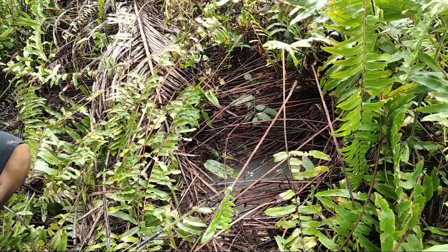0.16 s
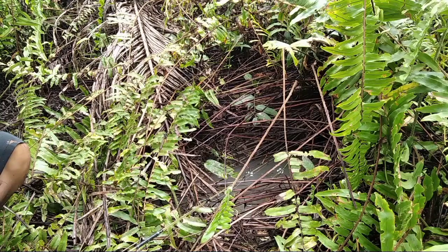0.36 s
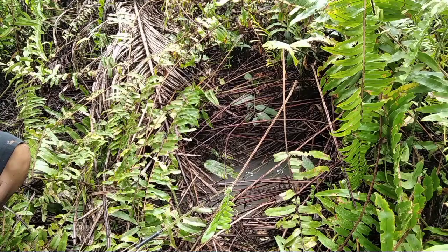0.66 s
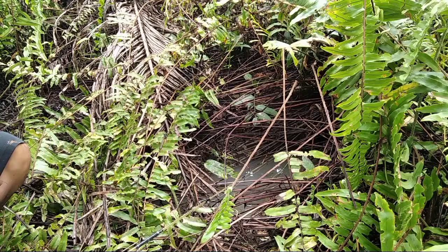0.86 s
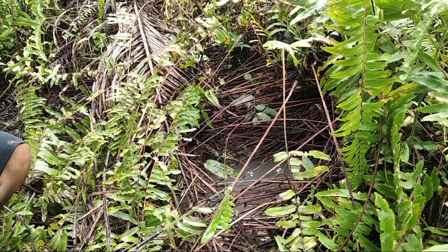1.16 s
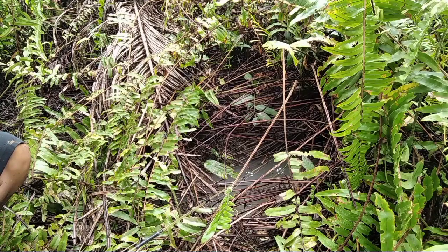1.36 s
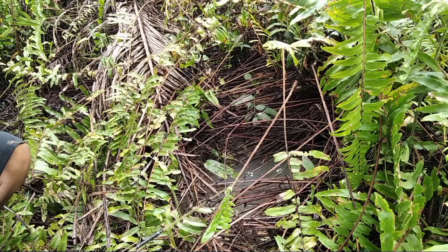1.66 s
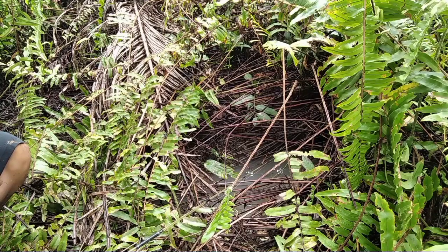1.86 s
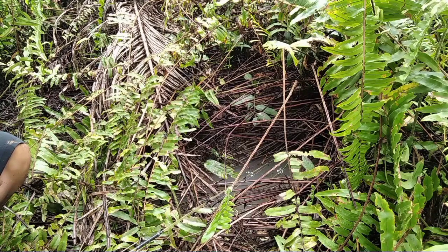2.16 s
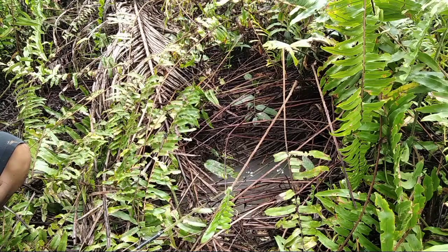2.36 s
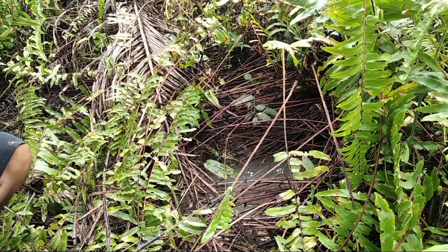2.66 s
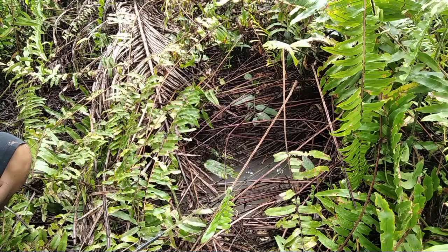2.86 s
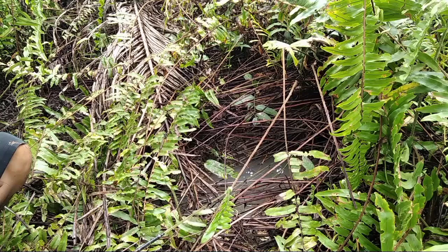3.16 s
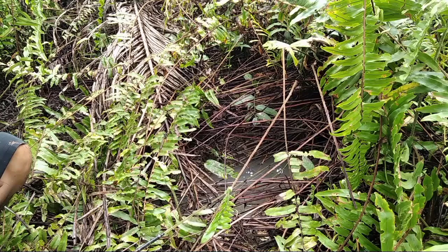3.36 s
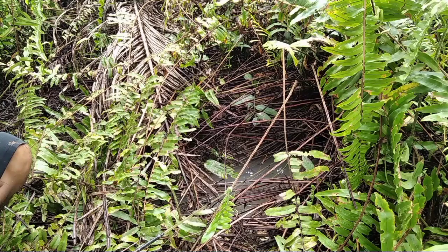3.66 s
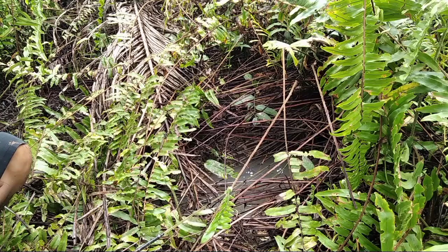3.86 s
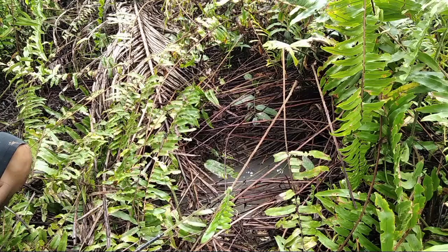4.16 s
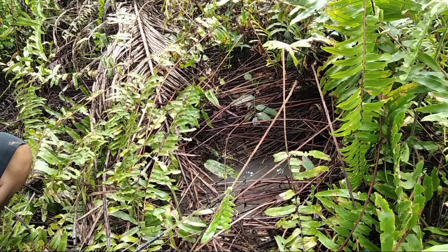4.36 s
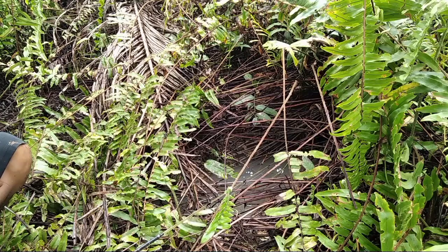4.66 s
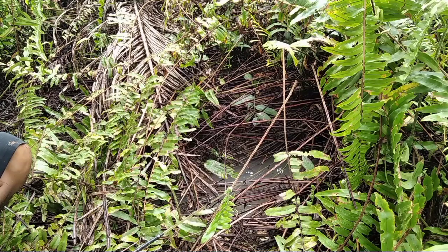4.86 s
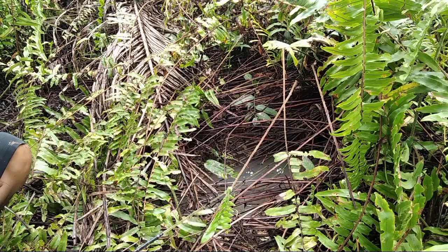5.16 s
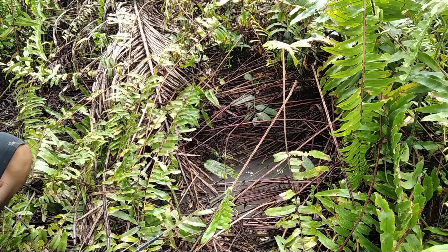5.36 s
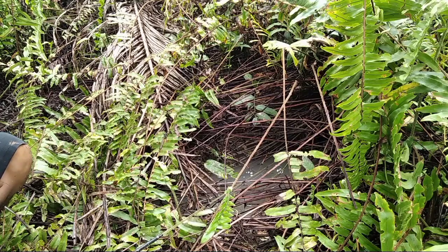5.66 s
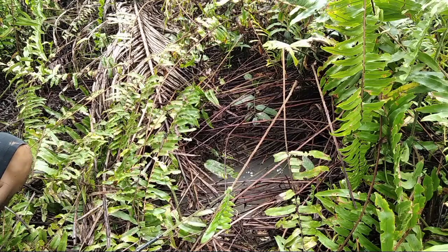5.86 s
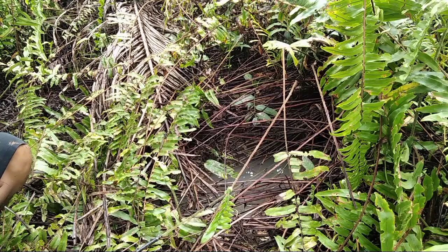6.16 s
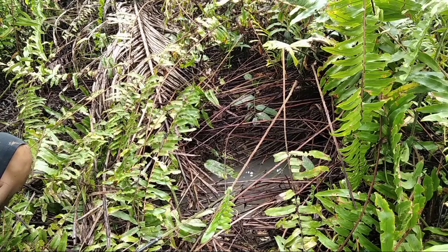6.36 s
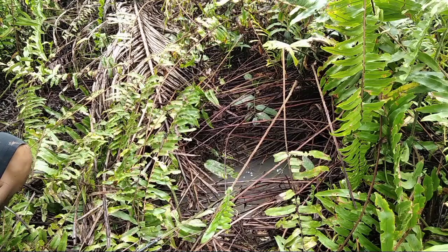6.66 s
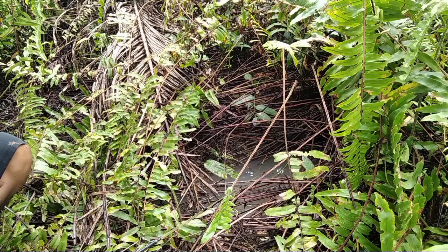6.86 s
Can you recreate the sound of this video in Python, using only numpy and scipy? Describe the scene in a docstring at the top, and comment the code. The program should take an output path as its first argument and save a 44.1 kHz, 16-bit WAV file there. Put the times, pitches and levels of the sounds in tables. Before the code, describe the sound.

Outdoors in ferny undergrowth, a continuous high insect shrill dominates, with nearer katydids pulsing rapidly and thin cricket tones inside it. Far behind, a cicada whines near the start and again late, a bird repeats a short raspy phrase, and another whistles four descending notes toward the end. Dry twigs tick occasionally; a very faint engine wavers. The stereo microphone sits amid the insects, with soft air and light breeze rumble.

```python
"""A dense insect chorus shrills in the ferns of a plantation, many rough pulse trains blurred by leaf echoes.
Three nearer katydids pulse inside it as filtered bursts of noise, and thin cricket tones run through it.
Far off, a cicada whines on and off, one bird repeats a short raspy phrase of fluttering tones,
and another whistles four notes, each starting lower than the last. A few dry twigs tick as ringing
cracks, and a very distant engine wavers as a few harmonics over the soft noise rumble of the air."""
import sys
import numpy as np
from scipy import signal
from scipy.fft import rfft, irfft
from scipy.io import wavfile

SR = 44100
rng = np.random.default_rng(int(sys.argv[2]) if len(sys.argv) > 2 else 0)


def put_to_file(sound):
    """Save the sound as 16-bit audio at rate SR, in the file named by the first command-line argument."""
    columns = np.atleast_2d(sound).T  # one column per channel
    safe = np.clip(columns, -1, 1)
    whole_steps = np.round(safe * 32767)
    wavfile.write(sys.argv[1], SR, whole_steps.astype(np.int16))


N = 310023


def from_db(db):
    """Decibels to gain."""
    return 10 ** (np.asarray(db) / 20)


def rms_one(x):
    """Scale to rms 1."""
    return x / np.sqrt(np.mean(x ** 2) + 1e-20)


def seconds():
    """The time of every sample."""
    return np.arange(N) / SR


def in_time(rows):
    """Join the rows of a curve by straight lines, one array per column."""
    s, *columns = np.transpose(rows)
    return [np.interp(seconds(), s, column) for column in columns]


def turning(hz):
    """The phase in radians of an oscillation whose rate follows a curve in Hz."""
    return 2 * np.pi * np.cumsum(hz) / SR


def bins_hz():
    """The frequencies of a whole-length spectrum, with the lowest bin kept off zero."""
    return np.maximum(np.arange(N // 2 + 1), 1) * SR / N


def over_hz(points):
    """Join (Hz, value) points on a log-frequency axis."""
    hz, value = np.transpose(points)
    return np.interp(np.log(bins_hz()), np.log(hz), value)


def colour(x, spectrum):
    """Weight x by a spectrum that falls away steeply outside its ends; rms 1."""
    hz = bins_hz()
    lowest_hz, highest_hz = spectrum[0][0], spectrum[-1][0]
    skirts = np.minimum(1, np.minimum(hz / lowest_hz, highest_hz / hz)) ** 24
    return rms_one(irfft(rfft(x) * from_db(over_hz(spectrum)) * skirts, N))


def resonate(x, hz, width_hz):
    """A two-pole resonance with gain 1 on top."""
    r = np.exp(-np.pi * width_hz / SR)
    feed = np.array([1, 0, -1]) * (1 - r * r) / 2
    feedback = [1, -2 * r * np.cos(2 * np.pi * hz / SR), r * r]
    return signal.lfilter(feed, feedback, x + 1e-18)


def drift(rate):
    """Smooth chance of spread 1 that changes about `rate` times a second."""
    low_pass = signal.butter(2, rate, fs=SR, output="sos")
    # the first second lets the filter settle
    return rms_one(signal.sosfilt(low_pass, rng.standard_normal(N + SR))[SR:])


def pan(lean_db):
    """Left and right gains for a level difference, left minus right."""
    return from_db(np.array([[.5], [-.5]]) * lean_db)


def foliage(x, t60, wet_db, lag_s=0):
    """Direct sound, later on the left for a positive lag, plus a dying cloud of leaf echoes; keeps the power."""
    t = np.arange(int(t60 * SR) + 128) / SR
    paths = rng.standard_normal((2, len(t))) * from_db(-60 * t / t60)
    paths *= from_db(wet_db) / np.linalg.norm(paths, axis=1, keepdims=True)
    paths[0, round(max(lag_s, 0) * SR)] += 1
    paths[1, round(max(-lag_s, 0) * SR)] += 1
    paths /= np.linalg.norm(paths, axis=1, keepdims=True)
    return signal.oaconvolve(x[None], paths, axes=1)[:, :N]


def stridulate(syllable_rate, pulse_rate, share, pulse_decay_s, unsteady):
    """Each syllable is a swelling run of wing strokes, each a short, rounded burst of file-tooth scraping."""
    t = seconds()
    wander = unsteady * np.sin(2 * np.pi * (t * rng.uniform(.1, .3) + rng.random()))  # in syllables
    phase = (syllable_rate * t + wander + rng.random()) % 1
    since_stroke = phase / syllable_rate % (1 / pulse_rate)
    # the swell steps once per stroke, so every stroke has one strength
    stroke_phase = phase - since_stroke * syllable_rate + .5 * syllable_rate / pulse_rate
    swell = np.sin(np.pi * np.minimum(stroke_phase / share, 1))
    stroke = since_stroke * np.exp(-since_stroke / pulse_decay_s)
    return rms_one(swell * stroke * rng.standard_normal(N))


# Spectra of the ferns' main shrill, a lower species and a very high one.
# Each row: frequency in Hz, relative density in dB per Hz.
SHRILL_SPECTRUM = [(5900, -65), (6250, -26.5), (6760, -9), (7100, 2), (7600, 4.5), (8050, 2.5), (8500, -4),
                   (9000, -12.5), (9650, -18), (10200, -25.5), (11100, -24), (11900, -35.5), (13200, -45)]
LOW_SHRILL_SPECTRUM = [(4800, -20), (5100, -8), (5350, 3.5), (5650, 14.5), (5900, 12), (6200, -14),
                       (6500, -54)]
HIGH_SHRILL_SPECTRUM = [(13000, -32), (13150, -8), (13300, -11), (13650, -11), (13900, -2), (14200, -4),
                        (14400, -30)]
# Where the chorus sits across the stereo pair. Each row: frequency in Hz, left minus right in dB.
CHORUS_LEAN = [(6000, -0.5), (6900, -0.5), (7500, -2.5), (8000, -3.5), (8400, 7), (8750, -12), (9300, 11.5),
               (10500, -0.5), (12500, 2), (13800, 4)]


def chorus(count=16):
    """Many insects, each at its own pace and place, blur into a shrill in three registers."""
    crowd = 0
    for pace, strokes, side in rng.uniform(-1, 1, (count, 3)):
        song = stridulate(28 + 9 * pace, 170 + 70 * strokes, share=.78, pulse_decay_s=.0011, unsteady=1.2)
        crowd = crowd + foliage(song, t60=.16, wet_db=6, lag_s=.00045 * side)
    voices = from_db(-27) * colour(crowd, SHRILL_SPECTRUM)
    voices += from_db(-56) * colour(crowd, LOW_SHRILL_SPECTRUM)
    voices += from_db(-51.5) * colour(crowd, HIGH_SHRILL_SPECTRUM)
    return irfft(rfft(voices) * pan(over_hz(CHORUS_LEAN)), N)


# Three singers nearer the microphones. Each row: syllables per second, wing strokes per second,
# sounding share of a syllable, pitch in Hz, half-width in Hz, level in dB, left minus right in dB,
# lag of the left side in seconds, upper wing resonance in dB against the main one.
NEAR_KATYDIDS = [(26.44, 101, .74, 8180, 380, -37, -3, .00041, -17),
                 (24.2, 92, .7, 8720, 200, -46.5, 4, -.00036, -30),
                 (25.3, 177, .8, 13950, 250, -57, 4, 0, -60)]
UPPER_WING_RATIO = 1.2  # upper wing resonance over the main pitch


def wing_resonance(song, hz, half_width_hz):
    """The wing lets through one band of the scraping; rms 1."""
    band = [hz - half_width_hz, hz + half_width_hz]
    return rms_one(signal.sosfilt(signal.butter(3, band, "band", fs=SR, output="sos"), song))


def katydids():
    """Near singers: regular syllables of a few strokes ring two wing resonances and stay distinct."""
    out = 0
    for syllable_rate, pulse_rate, share, hz, half_width_hz, level_db, lean_db, lag_s, upper_db in NEAR_KATYDIDS:
        song = stridulate(syllable_rate, pulse_rate, share, pulse_decay_s=.0018, unsteady=.04)
        main = wing_resonance(song, hz, half_width_hz)
        upper = wing_resonance(song, hz * UPPER_WING_RATIO, half_width_hz)
        heard = foliage(main + from_db(upper_db) * upper, t60=.05, wet_db=-6, lag_s=lag_s)
        out = out + from_db(level_db) * pan(lean_db) * heard
    return out


def blurred_tone(hz, width_hz):
    """A tone on a pitch curve whose strength and phase flutter, spreading it over a width."""
    phase = turning(hz * np.ones(N))
    return rms_one(drift(width_hz / 2) * np.cos(phase) + drift(width_hz / 2) * np.sin(phase))


# Crickets among the ferns, each on one steady pitch.
# Each row: pitch in Hz, width in Hz, level in dB, left minus right in dB.
CRICKET_TONES = [(7548, 30, -43.5, -7), (7677, 60, -46.5, -12), (7950, 25, -47, 4), (8280, 50, -49, 9),
                 (9690, 55, -57, 5), (10170, 45, -65, 8), (10304, 55, -65, 8), (11170, 70, -69, 6)]


def crickets():
    """Thin tones of steady pitch inside the shrill, each fluttering within a narrow band."""
    out = 0
    for hz, width_hz, level_db, lean_db in CRICKET_TONES:
        heard = foliage(blurred_tone(hz, width_hz), t60=.02, wet_db=5)
        out = out + from_db(level_db) * pan(lean_db) * heard
    return out


# How alike the air is at the two microphones.
# Each row: frequency in Hz, likeness from -1 (opposite) to 1 (the same).
LEFT_RIGHT_LIKENESS = [(40, 0.51), (150, 0.3), (400, 0.16), (900, -0.06), (1400, -0.08), (2200, 0.056),
                       (5000, -0.22)]


def moving_air(spectrum):
    """Stereo noise, clearly alike on both sides only in the bass."""
    mid, side = rfft(rng.standard_normal((2, N)))
    alike = np.clip(over_hz(LEFT_RIGHT_LIKENESS), -1, 1)
    stereo = np.sqrt(1 + alike) * mid + np.sqrt(1 - alike) * side * [[1], [-1]]
    return colour(irfft(stereo, N), spectrum)


# Still air of the place, then breeze rumble on the microphone.
# Each row: frequency in Hz, relative density in dB per Hz.
AIR_SPECTRUM = [(40, -47), (75, -14), (100, -7), (125, -12), (320, -19), (520, -20), (1000, -23),
                (2200, -26), (3500, -29.5), (4300, -28.5), (4700, -29.5), (14000, -54)]
RUMBLE_SPECTRUM = [(10, 8), (28, -7), (45, -2), (60, -9), (80, -25.5), (140, -55)]
# Gusts at the microphone. Each row: time of the peak in seconds, rise in dB.
BREEZE_GUSTS = [(3.5, 1.5), (4.1, 2.5), (4.7, 6.5), (5.85, 5.5), (6.6, 2)]
BREEZE_DB, GUST_S = -54, 0.15  # rumble between gusts, time from a gust's peak to 1/e of its rise


def air():
    """A steady far hush, and a light breeze rumbling on the microphone in soft gusts."""
    t = seconds()
    gusts_db = sum(rise_db * np.exp(-((t - s) / GUST_S) ** 2) for s, rise_db in BREEZE_GUSTS)
    hush = from_db(-58.5) * moving_air(AIR_SPECTRUM)
    return hush + from_db(BREEZE_DB + gusts_db) * moving_air(RUMBLE_SPECTRUM)


# Bouts of the far cicada. Each row: time of full effort in seconds, level in dB.
CICADA_PEAKS = [(.68, -65.5), (6.131, -64.5)]
CICADA_BUILD_S, CICADA_FADE_S = 1.7, 0.41
CICADA_REST_HZ, CICADA_RISE_HZ = 4897, 294  # pitch at no effort, and what full effort adds


def cicada(width_hz=90):
    """A far, rough whine; effort builds and ebbs in each bout and lifts pitch and strength together."""
    t, whine = seconds(), 0
    for peak_s, level_db in CICADA_PEAKS:
        building = np.clip(1 + (t - peak_s) / CICADA_BUILD_S, 0, 1) ** .35
        effort = building * np.exp(-np.maximum(t - peak_s, 0) / CICADA_FADE_S)
        tone = blurred_tone(CICADA_REST_HZ + CICADA_RISE_HZ * np.sqrt(effort), width_hz)
        whine = whine + from_db(level_db) * effort ** .61 * tone
    return foliage(whine, t60=.27, wet_db=8)


# Phrases of the far raspy bird. Each row: start in seconds, level in dB, extra dB on its lowest rasp.
RASPY_PHRASES = [(0.025, -57.5, -4), (1.537, -58, -3), (3.865, -58.5, -2), (5.376, -60, 0.5)]
# The notes of a phrase. Each row: delay in seconds, length in seconds, pitch in Hz, glide in Hz,
# roughness as a width in Hz, level in dB against the phrase.
RASPY_NOTES = [(0, 0.11, 4230, 1, 200, -6.5), (0.13, .18, 1800, 200, 480, -5),
               (0.146, 0.18, 2408, 330, 450, -7), (0.269, 0.069, 2708, 610, 453, -3),
               (0.304, 0.126, 3336, 62, 109, -3)]
RATTLES_PER_S, RATTLE_DEPTH = 55, .45
LOW_RASP_BELOW_HZ = 2100  # a note pitched under this is the lowest rasp


def raspy_bird():
    """A rattling phrase of a high chip, two soft rasps and a quick sweep up into a clearer note."""
    song, t = 0, seconds()
    for delay, length, hz, glide_hz, width_hz, note_db in RASPY_NOTES:
        swell, glide = 0, 0
        for start, phrase_db, low_db in RASPY_PHRASES:
            progress = np.clip((t - start - delay) / length, 0, 1) % 1  # 0 outside the note
            level_db = phrase_db + note_db + low_db * (hz < LOW_RASP_BELOW_HZ)
            swell = swell + from_db(level_db) * np.sqrt(np.sin(np.pi * progress))
            glide = glide + progress
        song = song + swell * blurred_tone(hz + glide_hz * glide ** 2, width_hz)
    rattle = rms_one(1 + RATTLE_DEPTH * np.sin(turning(RATTLES_PER_S + 10 * drift(20.3))))
    return foliage(song * rattle, t60=.8, wet_db=1)


# Ticks of dry twigs. Each row: time in seconds, crack in dB, hollow knock in dB.
TWIG_TICKS = [(.323, -51, -70), (2.746, -53, -64), (3.0964, -53, -70), (3.139, -53, -70),
              (3.185, -54.5, -70), (3.27, -55, -60), (3.5887, -51.5, -58), (6.105, -51.5, -63),
              (6.13, -49, -53)]
# What a twig rings with. Each row: frequency in Hz, width in Hz, gain in dB.
TWIG_MODES = [(750, 600, 4), (1600, 1100, 8.5), (2650, 1200, 10.5)]
TWIG_DULL_HZ = 4300  # the undergrowth swallows what lies above
KNOCK_HZ, KNOCK_S = 894, 0.0092  # pitch and decay of the hollow knock


def twigs(crack_s=.01):
    """Small dry cracks of dying noise ring the twig's broad modes, with a hollow knock of varying strength."""
    t = seconds()
    cracking, knocks = 0, 0
    for s, crack_db, knock_db in TWIG_TICKS:
        begun, age = t >= s, np.abs(t - s)
        cracking = cracking + from_db(crack_db) * begun * np.exp(-age / crack_s)
        knock = np.exp(-age / KNOCK_S) * np.sin(2 * np.pi * KNOCK_HZ * (t - s))
        knocks = knocks + from_db(knock_db) * begun * knock
    cracks = cracking * rng.standard_normal(N)
    ringing = 0
    for k, (hz, width_hz, db) in enumerate(TWIG_MODES):
        ringing = ringing + (-1) ** k * from_db(db) * resonate(cracks, hz, width_hz)  # signs alternate
    ringing = signal.sosfilt(signal.butter(2, TWIG_DULL_HZ, fs=SR, output="sos"), ringing)
    return foliage(ringing + knocks, t60=.054, wet_db=12)


# Course of the engine far away. Each row: time in seconds, firing rate in Hz, level in dB.
ENGINE_COURSE = [(2.9, 255, -84), (3.25, 285, -81), (3.6, 258, -81), (4.3, 255, -88), (5.5, 252, -83),
                 (5.645, 260, -74), (5.7, 254, -76), (5.86, 267, -74), (5.955, 277, -67), (6.025, 258, -81),
                 (6.075, 247, -73), (6.115, 265, -67), (6.16, 252, -69.5), (6.21, 262, -80),
                 (6.275, 266, -72), (6.4, 259, -77), (6.57, 252, -75), (6.68, 242, -84), (6.82, 261, -76),
                 (6.94, 276, -72), (7.03, 284, -82)]
# Its partials. Each row: multiple of the firing rate, relative level in dB.
ENGINE_PARTIALS = [(1, 0), (2, 6), (3, -4), (4, -4)]
ENGINE_EMERGES_S = 0.66  # it swells out of the hush before the first row


def engine():
    """A small engine emerges far away, its speed wavering; the air between makes it fade in and out."""
    hz, level_db = in_time(ENGINE_COURSE)
    emerging = np.clip(1 + (seconds() - ENGINE_COURSE[0][0]) / ENGINE_EMERGES_S, 0, 1)
    phase = turning(hz * (1 + .024 * drift(30)))
    drone = sum(from_db(db) * np.sin(round(k) * phase) for k, db in ENGINE_PARTIALS)
    return foliage(emerging * from_db(level_db + drift(12)) * drone, t60=.2, wet_db=-8)


# Notes of the far whistling bird. Each row: start in seconds, length in seconds, starting pitch in Hz,
# rise in Hz, level in dB, dB that the leaves take from the direct path,
# phase between the two sides in radians, closing flick in Hz.
WHISTLE_NOTES = [(4.912, .24, 3100, 15, -59.3, 4, .7, 50), (5.48, .255, 2835, 85, -48.5, 1, 1.9, 130),
                 (6.137, .25, 2720, 135, -48, 1, 2.0, 200), (6.728, .235, 2660, 170, -47.5, .5, 2.0, 250)]
# Moments when the whistle turns hollow, opposite in phase on the two sides.
# Each row: time in seconds, depth from 0 to 1.
HOLLOW_MOMENTS = [(5.532, 0.7), (5.592, 0.8), (6.213, 0.84), (6.262, .55), (6.844, 1), (6.912, 1)]
HOLLOW_S = 0.014  # how long it stays hollow, either side of each time
SCOOP_HZ, SCOOP_S = 112.3, 0.0059  # each note scoops up from below
FLICK_S = 0.0112  # and ends in a downward flick
QUAVERS_PER_S, QUAVER_HZ, QUAVER_DB = 31, 18, 2  # a fast quaver shakes pitch and strength
# shares of a note: until which its pitch holds level, and at which it tops out
WHISTLE_HOLD, WHISTLE_CREST = .18, .68
WHISTLE_ECHO_DB = -10


def whistler(fade_s=0.027, waver_hz=10):
    """Quavering notes hold level, step up into an arch and flick down; stirring leaves smear their echoes."""
    song, direct, t = 0, 0, seconds()
    quaver = turning(QUAVERS_PER_S + 2 * drift(8))
    for start, length, hz, rise_hz, level_db, screened_db, side_phase, flick_hz in WHISTLE_NOTES:
        age = np.clip(t - start, 0, length)
        past_hold = np.maximum(age / length - WHISTLE_HOLD, 0) / (WHISTLE_CREST - WHISTLE_HOLD)
        arch = np.sin(np.pi / 2 * past_hold) ** 2
        scoop_hz = SCOOP_HZ * np.exp(-age / SCOOP_S)
        closing_hz = flick_hz * np.exp((age - length) / FLICK_S)
        shake_hz = QUAVER_HZ * np.cos(quaver) + waver_hz * drift(42.6)
        phase = turning(hz + rise_hz * arch - scoop_hz - closing_hz + shake_hz)
        gate = np.clip(np.minimum(age, length - age) / fade_s, 0, 1)
        note = gate * from_db(level_db) * np.sqrt(2) * np.cos([phase, phase + side_phase])
        song = song + note[0]
        direct = direct + from_db(-screened_db) * note
    uneven = .5 * np.array([drift(20), drift(16)])  # separate on each side
    beats = rms_one(from_db(QUAVER_DB * (np.sin(quaver) + uneven)))
    echoes = foliage(song * drift(30), t60=1.1, wet_db=15)
    heard = beats * (direct + from_db(WHISTLE_ECHO_DB) * echoes)
    hollow = sum(depth * np.exp(-np.abs((t - s) / HOLLOW_S) ** np.e) for s, depth in HOLLOW_MOMENTS)
    # taking out what both sides share leaves them opposite
    return heard - np.minimum(hollow, 1) * heard.mean(axis=0)


def scene():
    """Insects all around, birds and small sounds behind them."""
    insects = chorus() + katydids() + crickets()
    background = air() + cicada() + raspy_bird() + twigs() + engine() + whistler()
    return insects + background


CUTOFF_HZ = 14280


def record(dry):
    """The top is cut steeply."""
    return signal.sosfilt(signal.ellip(16, .1, 90, CUTOFF_HZ, fs=SR, output="sos"), dry)


dry = scene()
out = record(dry)
put_to_file(out)
```